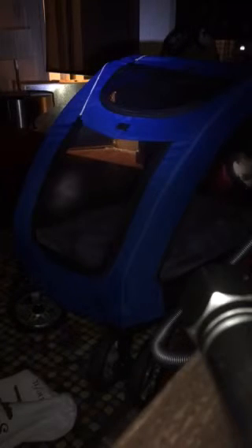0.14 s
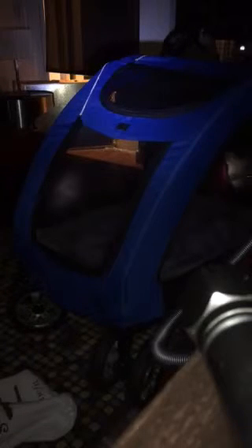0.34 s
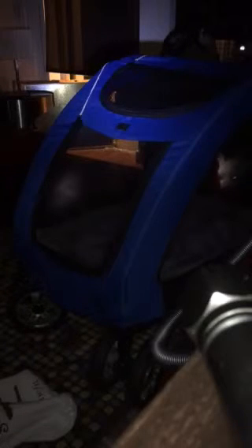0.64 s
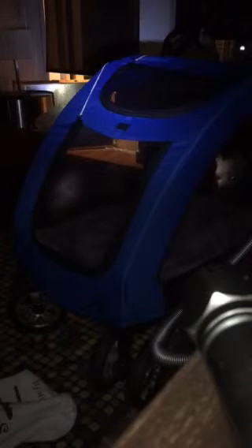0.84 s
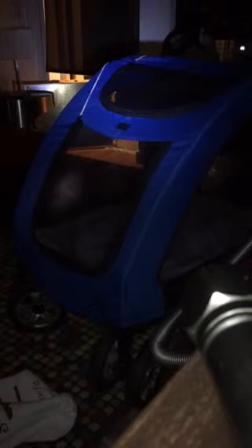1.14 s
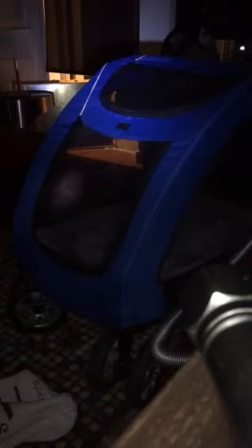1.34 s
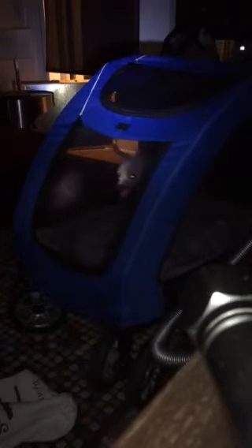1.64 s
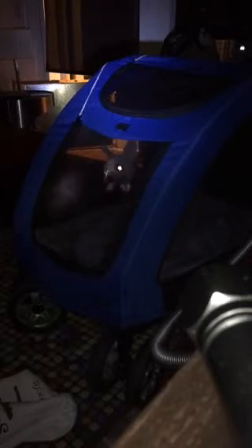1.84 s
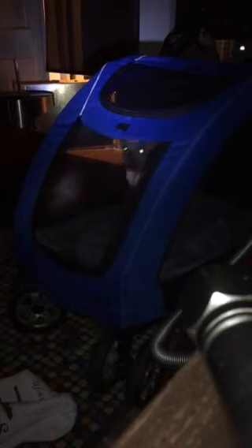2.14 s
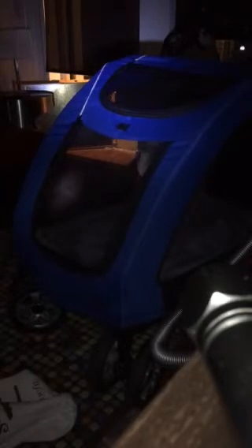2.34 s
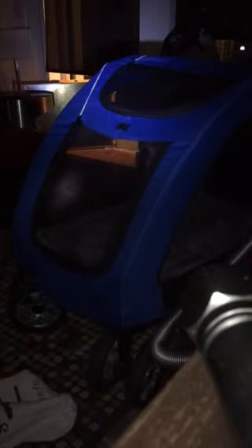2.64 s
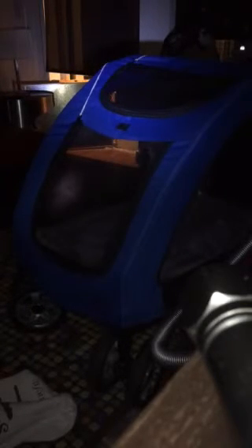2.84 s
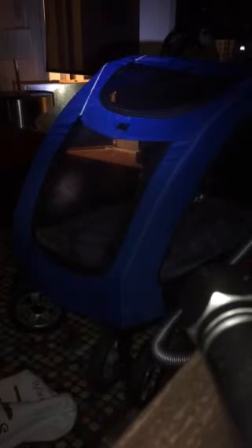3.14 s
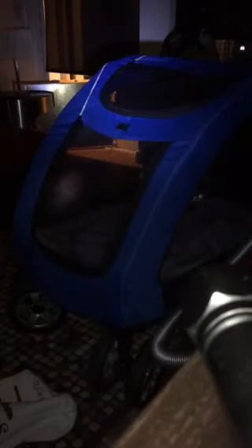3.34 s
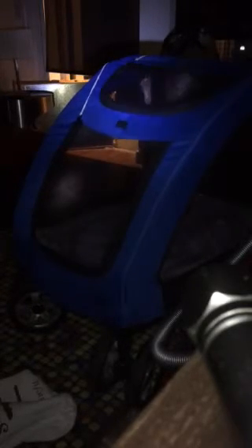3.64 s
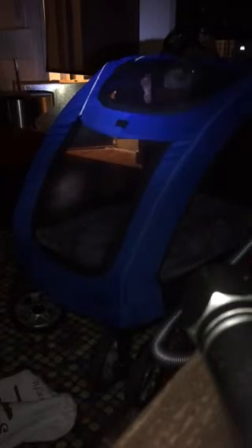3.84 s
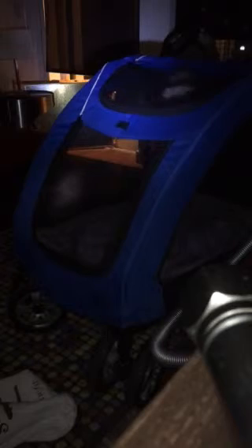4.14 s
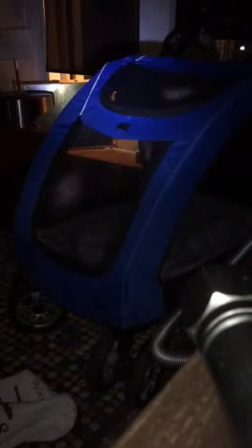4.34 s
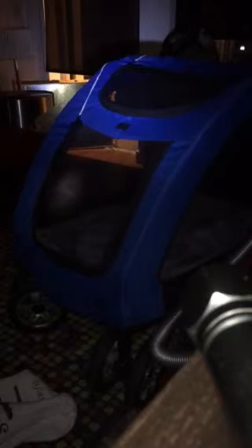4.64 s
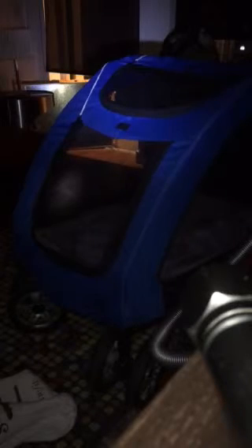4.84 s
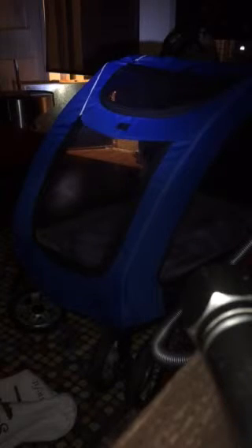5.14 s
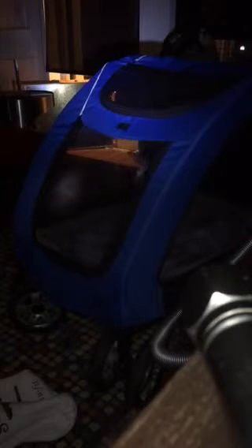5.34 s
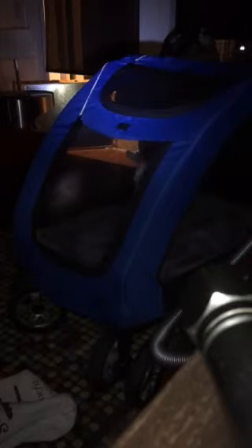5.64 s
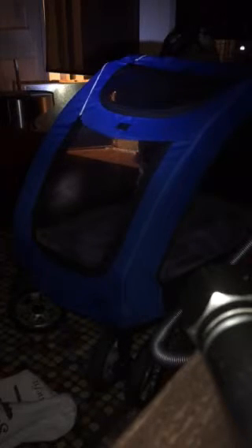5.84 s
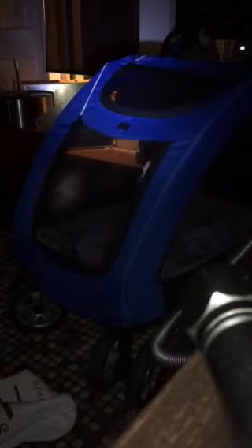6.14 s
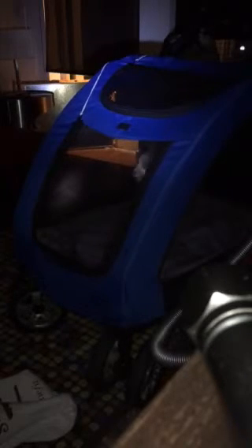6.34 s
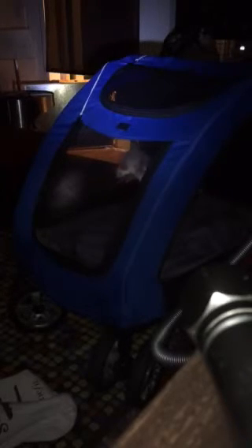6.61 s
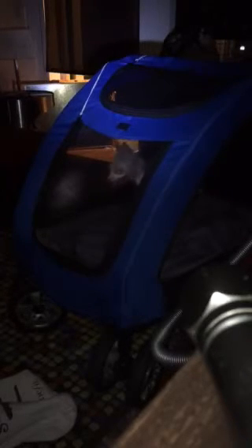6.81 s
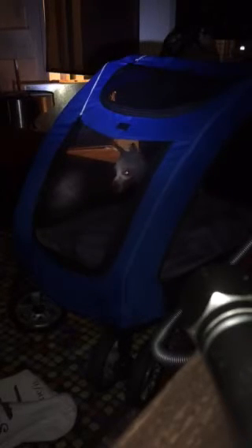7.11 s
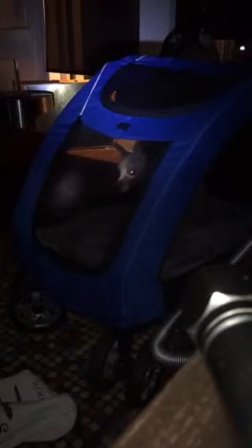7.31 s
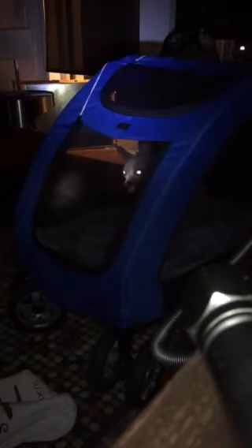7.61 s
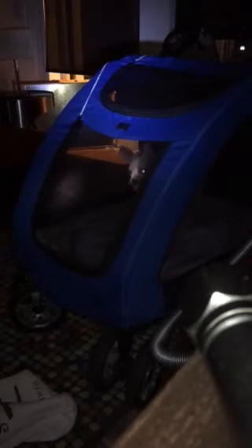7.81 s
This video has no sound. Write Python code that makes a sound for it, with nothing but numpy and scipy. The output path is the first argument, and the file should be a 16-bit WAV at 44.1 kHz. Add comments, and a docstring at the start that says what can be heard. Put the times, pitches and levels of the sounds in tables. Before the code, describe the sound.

A small dog shut in a fabric stroller kennel gives two pairs of short high yips, with thin whistling whines and sniffs, over a low hum.

```python
"""A small dog yips in two pairs with a fainter yip between, in a room with a mains hum and a soft rush of air.
It also whines and squeaks in thin, very high whistles, sniffs, and turns round in a fabric stroller kennel.
The voice is a nearly pure tone with overtones shaped by the throat; the whistles are single wavering tones.
Sniffs, paws, rubbing and air are noise given the colour of nose, fabric or room; the hum is a set of tones.
Reflections and a short diffuse tail make the calls beat and ring on briefly."""
import sys
import numpy as np
from scipy import signal
from scipy.fft import rfft, irfft
from scipy.io import wavfile

SR = 44100
rng = np.random.default_rng(int(sys.argv[2]) if len(sys.argv) > 2 else 0)


def int16_out(signal):
    """Quantize to a 16-bit WAV file."""
    q = np.round(np.clip(np.atleast_2d(signal).T, -1, 1) * 32767)
    wavfile.write(sys.argv[1], SR, q.astype(np.int16))


N = 351565  # length of the scene in samples

# what the kennel fabric lets sound: (frequency [Hz], relative level [dB])
FABRIC_COLOUR = [(60, -6), (200, -5), (450, -1), (1000, 0.5), (2000, 0.5), (3500, -5.5), (6000, -10),
                 (10000, -15), (15000, -19)]
SWELL_ENDS_DB = -20.5  # how far a swell lies below its top at either end


def amp(db):
    """Turns decibels into a gain."""
    return 10 ** (np.asarray(db) / 20)


def unit(x):
    """Scales a sound to an average (rms) strength of one."""
    return x / np.sqrt(np.mean(x ** 2) + 1e-20)


def read(points, hz):
    """Reads a table of (frequency, value) between its points, along log frequency."""
    f, value = np.transpose(points)
    return np.interp(np.log(hz + 1), np.log(np.abs(f) + 1), value)


def follow(rows):
    """Turns rows into a start time and one smooth curve per remaining column."""
    s, *columns = np.transpose(rows)
    t = np.arange(s[0], s[-1], 1 / SR)
    return s[0], [np.interp(t, s, column) for column in columns]


def add(mix, s, sound):
    """Mixes a sound in at time s [s]."""
    part = mix[max(round(s * SR), 0):][:len(sound)]
    part += sound[:len(part)]


def colour(x, spectrum, tilt_db=0):
    """Gives noise a spectrum, tilted by tilt_db per octave, and a strength of one."""
    hz = np.fft.rfftfreq(len(x), 1 / SR)
    shape_db = read(spectrum, hz) + tilt_db * np.log2((hz + 100) / 3000)
    return unit(irfft(rfft(x) * amp(shape_db), len(x)))


def wander(size, hz):
    """Smooth random curve that moves up to about hz times a second; its long-run rms is one."""
    length = SR if size <= SR else N
    f = np.fft.rfftfreq(length, 1 / SR)
    slow = rfft(rng.standard_normal(length)) * np.exp(-(f / hz) ** 2)
    return unit(irfft(slow, length))[:size]


def hiss(size):
    """A short stretch of white noise, at most a second."""
    return rng.standard_normal(SR)[:size]


def hum(waver=0.048, loose=0.93):
    """An appliance drones at twice the mains frequency; its weaker tones come and go."""
    # tones of the hum: (frequency [Hz], level [dB])
    tones = [(59.8, -71), (83, -61.5), (120, -49), (156, -62.5), (223, -70.5), (297, -77), (359, -76),
             (416, -69)]
    t = np.arange(N) / SR
    out = np.zeros(N)
    strongest = max(db for hz, db in tones)
    for hz, db in tones:
        sway = waver if db == strongest else loose
        # a complex drift moves both strength and phase
        drift = 1 + sway * (wander(N, hz=1.7) + 1j * wander(N, hz=4.2))
        tone = drift * np.exp(2j * np.pi * (hz * t + rng.random()))
        out += amp(db) * unit(tone.real)
    return out


def air(above_hum_db=-59.35):
    """Soft, dull rush of moving air in the room, its level set by the part above 200 Hz."""
    # spectrum of the air: (frequency [Hz], relative level [dB])
    air_colour = [(20, -8.5), (50, 6.5), (90, 2), (190, -0.5), (400, -2.5), (540, -1.5), (680, -7),
                  (860, -3), (1300, -9.5), (1900, -11.5), (2900, -22.5), (6000, -29), (15500, -36.5)]
    rush = colour(rng.standard_normal(N), air_colour)
    above_hum = signal.sosfilt(signal.butter(4, 200, "high", fs=SR, output="sos"), rush)
    return amp(above_hum_db) * rush / above_hum.std()


def paw(s, db, decay_s, tilt_db):
    """A paw or claw scuffs taut fabric: a burst of noise that dies without ringing."""
    t = np.arange(SR // 5) / SR
    burst = np.exp(-t / decay_s) * (1 - np.exp(-t / 0.00026))
    return s, amp(db) * colour(hiss(len(t)), FABRIC_COLOUR, tilt_db) * burst


def nose_rush(size, tilt_db, flutter_db=3.0):
    """Turbulent air that rings the nose, shaped a little differently each time."""
    # the rush of air in the nose: (frequency [Hz], relative level [dB])
    rush_colour = [(300, -32.5), (900, -7), (2000, -3.5), (4500, -1.5), (7500, -6), (10000, -4),
                   (12000, -12.5), (15500, -16)]
    # nose and muzzle resonances before a small random shift: (frequency [Hz], width [Hz], boost [dB])
    resonances = [(850, 200, 8), (1600, 250, 3), (2660, 380, 9), (4330, 480, 9), (6300, 450, 7)]
    f = np.fft.rfftfreq(size, 1 / SR) * rng.uniform(.95, 1.05)  # this shifts the resonances
    ring_db = sum(boost_db / (1 + (2 * (f - hz) / width) ** 2) for hz, width, boost_db in resonances)
    rung = irfft(rfft(hiss(size)) * amp(ring_db), size)
    return colour(rung, rush_colour, tilt_db) * amp(flutter_db * wander(size, hz=40))


def sniff(s, db, tilt_db, length=.092):
    """One swell of air through the nose, centred on time s and lasting length [s]."""
    size = int(length * SR)
    swelling = np.sin(np.linspace(0, np.pi, size)) ** (3 / 2)
    return s - length / 2, amp(db) * nose_rush(size, tilt_db) * swelling


def whistle(hz, db, flutter_db=3.0):
    """One thin tone, unsteady in pitch and strength."""
    size = len(hz)
    quiver = 1 + .007 * wander(size, hz=200)
    phase = 2 * np.pi * np.cumsum(hz * quiver) / SR
    strength = np.sqrt(2) * amp(db + flutter_db * wander(size, hz=70))
    return strength * np.sin(phase) * signal.windows.tukey(size, .08)


def nasal_whistle(hz, db, leak_tilt_db=2.5, full_leak_db=-44, leak_growth=0.42):
    """A whistle in the nose, with air leaking past it that grows less than the whistle does."""
    # full_leak_db goes with a whistle at 0 dB; leak_growth is dB of leak per dB of whistle
    leak = amp(full_leak_db + leak_growth * db) * nose_rush(len(hz), leak_tilt_db)
    return whistle(hz, db) + leak * signal.windows.tukey(len(hz), .2)


def swell(rise, fall):
    """Time from the top of a swell, and its level in dB, falling evenly towards both ends."""
    t = np.arange(-rise, fall, 1 / SR)
    return t, np.interp(t, [-rise, 0, fall], [SWELL_ENDS_DB, 0, SWELL_ENDS_DB])


def squeak(s, rise, fall, start_hz, peak_hz, end_hz, db):
    """A brief nasal whistle that glides one way as it swells, and on or back as it fades."""
    t, swell_db = swell(rise, fall)
    hz = np.interp(t, [-rise, 0, fall], [start_hz, peak_hz, end_hz])
    return s + t[0], nasal_whistle(hz, db + swell_db)


def voice(hz, strength, overtones_db, rough, jitter=0.0017, rough_jitter=0.12, rough_shimmer=0.34,
          breath_db=-21, breath_tilt_db=8):
    """Nearly pure voice with overtones shaped by the throat; when rough, pitch and strength shake."""
    # what the throat passes of the overtones: (frequency [Hz], relative level [dB])
    throat = [(1000, -17), (2250, -18.5), (2600, -3.5), (3250, -2), (3600, -5), (3950, -11.5), (4400, -8.5),
              (5200, -21.5), (6500, -33), (8500, -33), (14000, -47)]
    size = len(hz)
    hz = hz * (1 + (jitter + rough_jitter * rough) * wander(size, hz=294))
    phase = 2 * np.pi * np.cumsum(hz) / SR
    overtones = sum(amp(read(throat, k * hz)) * np.cos(k * phase) for k in range(2, 6))
    # air escapes in one puff per opening of the vocal folds, and carries the top of the treble
    puffs = hiss(size) * (1 + np.cos(phase))
    breath = colour(puffs, throat, breath_tilt_db) * amp(breath_db) * (1 + 3 * rough)
    tone = np.cos(phase) + amp(overtones_db) * (overtones + breath)
    shimmer = 1 + rough_shimmer * rough * wander(size, hz=300)
    return np.sqrt(2) * strength * tone * shimmer


def yip(s, length, top_hz, scoop, db, overtones_db, fade_db_per_s, rough):
    """Pitch scoops up, then sags; level snaps on with a punch, trembles as it fades or grows, is cut off."""
    scoop_s, sag_per_s = .024, .45  # climbing time [s], then the share of pitch lost per second
    punch_db, punch_s = 5.5, .02  # the first push of air adds this level, and is spent in this time
    snap_db, snap_s = 4.5, .013  # the overtones start this much stronger and settle in this time
    tremble_db, tremble_bend = 1.5, 0.0087  # level [dB] and pitch [share] tremble together
    attack_s, release_s = 0.01, 0.0049
    t = np.arange(0, length, 1 / SR)
    tremble = wander(len(t), hz=61)
    climb = scoop * np.maximum(1 - t / scoop_s, 0)
    sag = sag_per_s * np.maximum(t - scoop_s, 0)
    hz = top_hz * (1 - climb - sag + tremble_bend * tremble)
    level_db = db + punch_db * np.exp(-t / punch_s) - fade_db_per_s * t + tremble_db * tremble
    edges = np.minimum(np.minimum(t / attack_s, (length - t) / release_s), 1)
    gate = np.sin(np.pi / 2 * edges) ** 2
    return s, voice(hz, amp(level_db) * gate, overtones_db + snap_db * np.exp(-t / snap_s), rough)


def puff(start, db):
    """The air left after a call escapes through the nose, strongest about 0.085 s after the call starts."""
    return sniff(start + .085, db, tilt_db=-1.5, length=.14)


def bark():
    """A forced, harsh yip: its pitch dips, then flips up, and it turns rough as the voice cracks."""
    # the bark before the mix: (time [s], pitch [Hz], level [dB], overtones re the fundamental [dB])
    curve = [(3.368, 1590, -27.5, -2), (3.376, 1325, -21.5, 1), (3.389, 1290, -22, 7.5),
             (3.397, 1520, -16.5, 0.5), (3.403, 1643, -18, -13), (3.410, 1670, -11.5, -23),
             (3.417, 1600, -33, -7.5), (3.453, 1170, -42, -16), (3.47, 1050, -62.5, -22)]
    crack_at_s, crack_s = 3.395, 0.0062
    start, (hz, db, overtones_db) = follow(curve)
    t = np.arange(len(hz)) / SR
    rough = np.interp(start + t, [crack_at_s, crack_at_s + crack_s], [.05, .3])
    return start, voice(hz, amp(db) * signal.windows.tukey(len(t), .05), overtones_db, rough)


def pitch_flick(s, hz, db, rise_s=0.0072, fade_s=.022, bend=0.036):
    """A brief high flick of the yip's pitch, played as its own short tone, highest where it is loudest."""
    t, swell_db = swell(rise_s, fade_s)
    bent_hz = hz * (1 - bend * swell_db / SWELL_ENDS_DB)
    return s + t[0], whistle(bent_hz, db + swell_db)


def rubbing(gain_db=-1.5, slips_per_s=1500, dull_db=-2.5, bright_db=5.0, scrape_db=3.5):
    """Many tiny slips of the weave: dull under the dog's weight, bright where its coat only brushes."""
    # the body rubbing along the kennel as it turns, before the gain: (time [s], level [dB])
    rub = [(3.68, -67), (3.7, -58.5), (3.778, -62), (3.784, -39), (3.812, -46), (3.916, -61.5),
           (4.162, -46), (4.176, -43.5), (4.208, -57), (4.256, -47), (4.304, -47.5), (4.42, -71)]
    brush_db, push_db = -78, -45  # table levels where only the coat brushes, and all the weight pushes
    start, (db,) = follow(rub)
    size = len(db)
    weight = np.clip((db - brush_db) / (push_db - brush_db), 0, 1)
    happens = rng.random((2, N)) < slips_per_s / SR
    slips = (happens * rng.standard_normal((2, N)))[:, :size]
    # an uneven strength gathers the slips into short scrapes
    push, brush = (part * amp(scrape_db * wander(size, hz=44)) for part in slips)
    dull = np.sqrt(weight) * colour(push, FABRIC_COLOUR, dull_db)
    bright = np.sqrt(1 - weight) * colour(brush, FABRIC_COLOUR, bright_db)
    return start, amp(db + gain_db) * (dull + bright)


def whine(rows, gain_db=-3.0):
    """A long nasal whistle that wanders in pitch."""
    start, (hz, db) = follow(rows)
    return start, nasal_whistle(hz, db + gain_db)


def room(x, tail_db=-8, build_s=0.016):
    """Direct sound, a few near reflections, then a diffuse tail whose fading depends on frequency."""
    # near walls and furniture: (delay [s], level re direct [dB])
    reflections = [(.0071, -15.5), (0.0137, -9), (0.016, -16), (0.0215, -20.5), (.0315, -17.5), (.043, -20)]
    # how long the tail takes to fall by 60 dB: (frequency [Hz], time [s])
    fade_times = [(200, .4), (1600, 0.31), (4000, 0.38), (10000, 0.3), (15000, 0.19)]
    hz, t, z = signal.stft(rng.standard_normal(SR * 3 // 4), SR, nperseg=256)
    fade = amp(-60 * t / read(fade_times, hz)[:, None])
    tail = signal.istft(z * fade, SR, nperseg=256)[1]
    tail *= 1 - np.exp(-(np.arange(len(tail)) / SR / build_s) ** 2)  # it builds up gradually
    response = amp(tail_db) * tail / np.linalg.norm(tail)
    response[0] += 1  # direct sound
    for delay, db in reflections:
        response[round(delay * SR)] += amp(db)
    return signal.oaconvolve(x, response)[:N]


def scene(yips_db=-0.9, whines_db=1.0, sniffs_db=2.0):
    """Dog and kennel sound into the room, over the hum and the air."""
    # Levels in these tables are those before the mix gains above and the swings inside each sound.
    # paws and claws on the kennel: (time [s], level [dB], decay [s], tilt [dB per octave])
    paws = [(1.10, -58.5, 0.0053, 7), (3.784, -38, 0.011, 10.5), (3.962, -43, 0.016, 18),
            (4.172, -35.5, 0.007, -2), (4.38, -47, 0.0023, 0), (4.438, -53, 0.013, 7)]
    # sniffs and snorts: (middle time [s], level [dB], tilt [dB per octave])
    sniffs = [(1.164, -65.5, 0), (1.369, -60, -4.5), (1.578, -63, -3), (1.842, -61, -8), (2.068, -60, -6),
              (2.181, -67.5, -3.5), (2.275, -66, -2.5), (2.412, -70.5, -0.5), (2.509, -58, -2),
              (2.882, -60.5, 0), (3.214, -48, -2.5), (4.453, -61, -7), (4.84, -62.5, -7.5),
              (6.576, -53, -2.5), (6.951, -53.5, -2), (7.161, -60, 0), (7.966, -52.5, -3.5)]
    # nasal squeaks: (loudest time [s], swell [s], fade [s], pitch at start, top and end [Hz], level [dB])
    squeaks = [(1.352, 0.02, 0.034, 8500, 8400, 8400, -50), (2.824, 0.061, 0.045, 8950, 9360, 9400, -44),
               (2.853, 0.017, 0.029, 9900, 10100, 10600, -46.5),
               (2.868, 0.017, 0.02, 9350, 8850, 8270, -43),
               (3.075, 0.023, 0.024, 9970, 10400, 11300, -27.5),
               (3.185, .06, .05, 10300, 9650, 9700, -39.5), (3.543, 0.016, 0.0075, 9570, 8940, 8100, -41.5),
               (3.745, 0.034, 0.042, 9130, 9600, 11300, -45.5),
               (3.967, 0.014, .013, 10500, 10300, 11300, -46), (3.995, 0.041, .03, 7530, 7600, 7570, -58),
               (4.555, 0.022, 0.0099, 8260, 8150, 8200, -38.5),
               (6.063, .03, .045, 10070, 10560, 11000, -37), (7.132, 0.028, 0.04, 8700, 9200, 9000, -52),
               (7.379, .03, 0.033, 6000, 6000, 5950, -65), (7.859, 0.023, 0.036, 6320, 6400, 5500, -51),
               (7.942, 0.018, .025, 6300, 6200, 5900, -53)]
    # yips: (time [s], length [s], top pitch [Hz], scoop up to it [0-1], level [dB],
    # settled overtones re the fundamental [dB], fade [dB per s], roughness [0-1], puff of air [dB])
    yips = [(3.019, 0.11, 1685, .05, -20, -12.5, 85, .03, -51),
            (4.548, 0.0413, 1121, 0.05, -34.5, -13, 62, .09, -54.5),
            (6.002, .056, 1710, .05, -19.5, -20.5, 189, 0.06, -54.5),
            (6.248, 0.036, 1661, .08, -21, -12.5, -40.5, 0.02, -64)]
    # high flicks of pitch in the yips: (loudest time [s], pitch there [Hz], level [dB])
    flicks = [(3.407, 2010, -23), (6.025, 1872, -23.5), (6.275, 2033, -34.5)]
    # three drawn-out whines, one curve each: (time [s], pitch [Hz], level [dB])
    whine_curves = [
        [(6.285, 10620, -50), (6.295, 10750, -39.5), (6.317, 11010, -34), (6.339, 9984, -36),
         (6.383, 10730, -44), (6.389, 10270, -44), (6.411, 10800, -38.5), (6.559, 10120, -39),
         (6.59, 9943, -48)],
        [(6.726, 8568, -67.5), (6.736, 8794, -41), (6.76, 9151, -42.5), (6.824, 8898, -51), (6.888, 9090, -40),
         (6.908, 8914, -52), (6.922, 9511, -32), (6.93, 9104, -53), (6.945, 9511, -49)],
        [(7.782, 8887, -62.5), (7.794, 9297, -51), (7.838, 10060, -29), (7.866, 10210, -31),
         (7.872, 10340, -32.5), (7.922, 10640, -40), (7.94, 10210, -30.5), (7.96, 10220, -45),
         (7.97, 10680, -42)],
    ]
    calls, whines, breaths, kennel = np.zeros((4, N))
    for row in paws:
        add(kennel, *paw(*row))
    for row in sniffs:
        add(breaths, *sniff(*row))
    for row in squeaks:
        add(whines, *squeak(*row))
    for s, *shape, puff_db in yips:
        add(calls, *yip(s, *shape))
        add(breaths, *puff(s, puff_db))
    bark_start, bark_sound = bark()
    add(calls, bark_start, bark_sound)
    add(breaths, *puff(bark_start, -48.5))
    for row in flicks:
        add(calls, *pitch_flick(*row))
    add(kennel, *rubbing())
    for rows in whine_curves:
        add(whines, *whine(rows))
    # the tiny mouth radiates little below 950 Hz
    calls = signal.sosfilt(signal.butter(6, 950, "high", fs=SR, output="sos"), calls)
    dog = amp(yips_db) * calls + amp(whines_db) * whines + amp(sniffs_db) * breaths
    return (room(dog + kennel) + hum() + air())[None]


def record(dry, edge_hz=15450):
    """The recorder's band limit: little passes above edge_hz."""
    low_pass = signal.firwin(511, edge_hz, window=("kaiser", 9), fs=SR)
    return signal.oaconvolve(dry, low_pass[None], "same")


dry = scene()
out = record(dry)
int16_out(out)
```